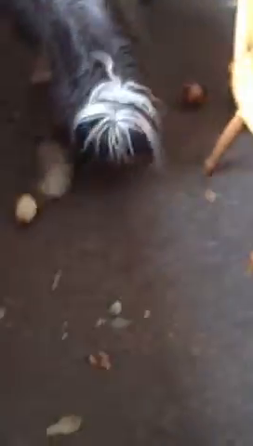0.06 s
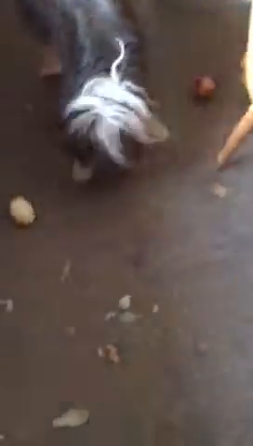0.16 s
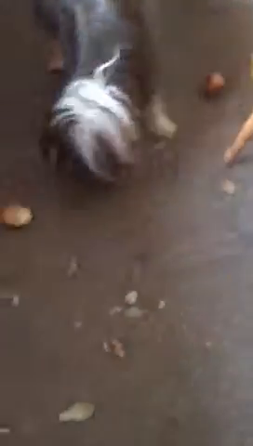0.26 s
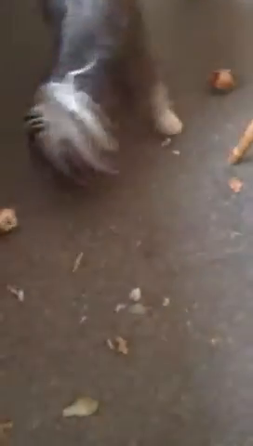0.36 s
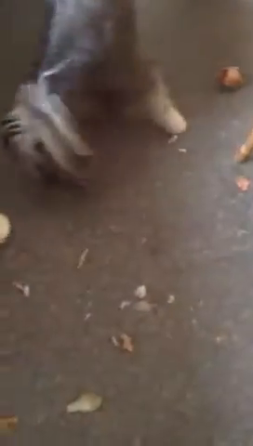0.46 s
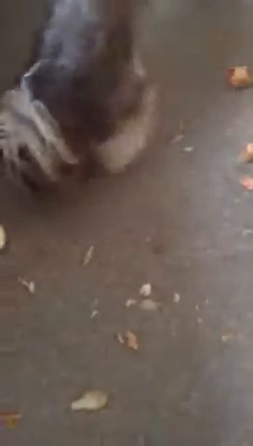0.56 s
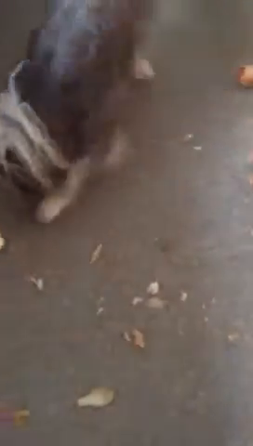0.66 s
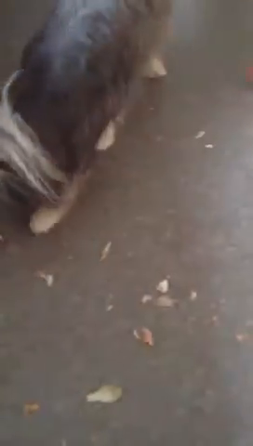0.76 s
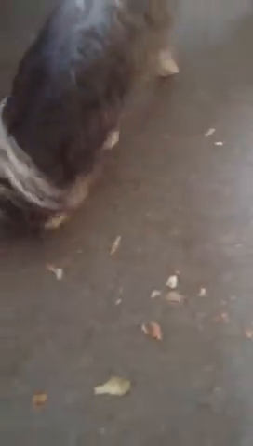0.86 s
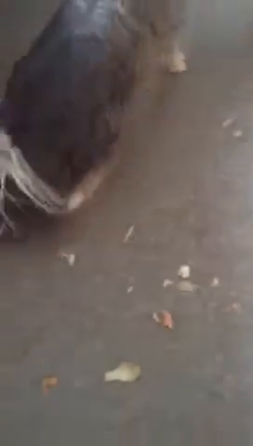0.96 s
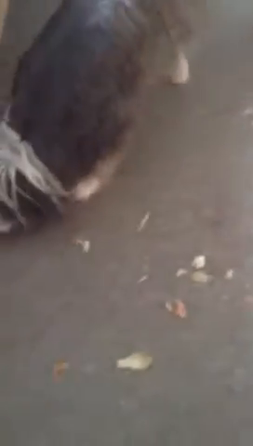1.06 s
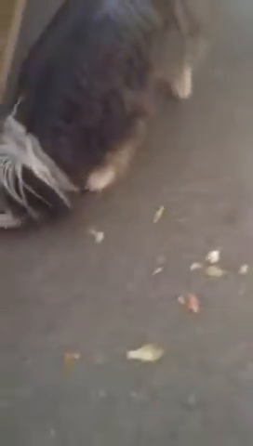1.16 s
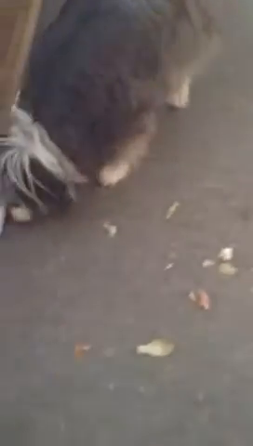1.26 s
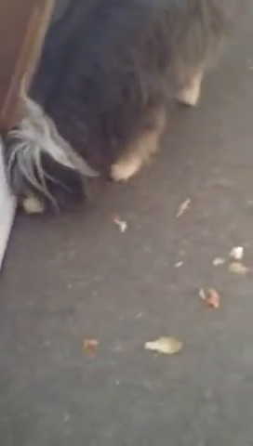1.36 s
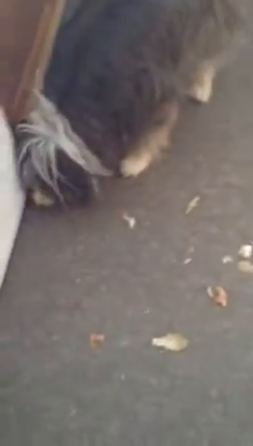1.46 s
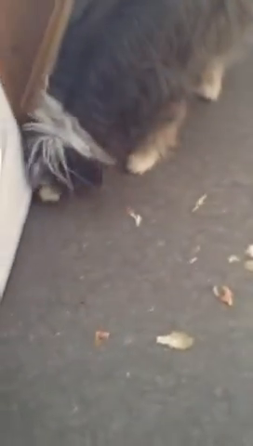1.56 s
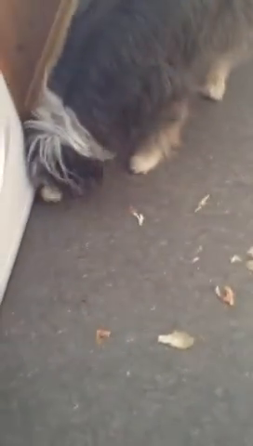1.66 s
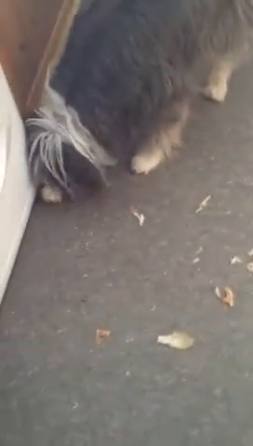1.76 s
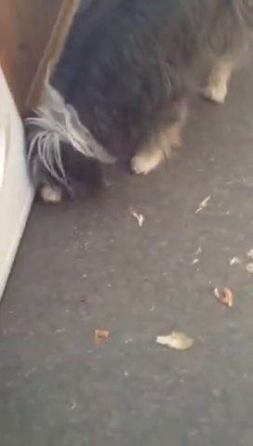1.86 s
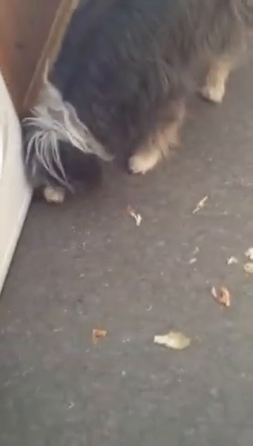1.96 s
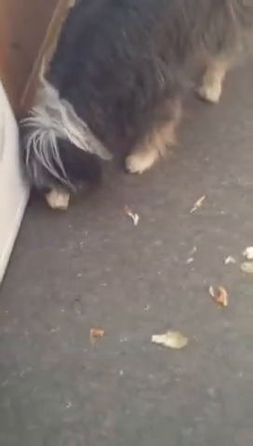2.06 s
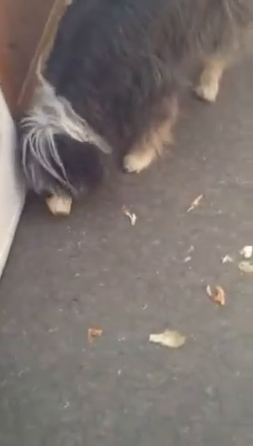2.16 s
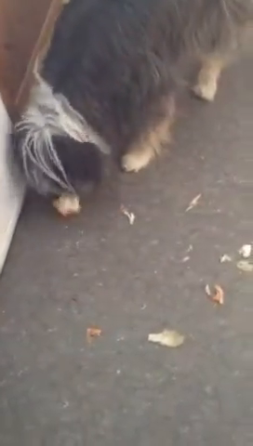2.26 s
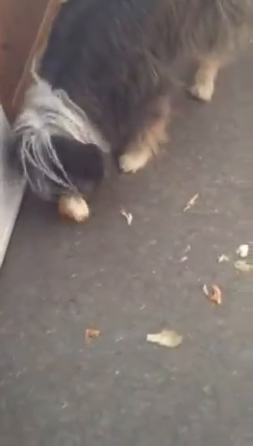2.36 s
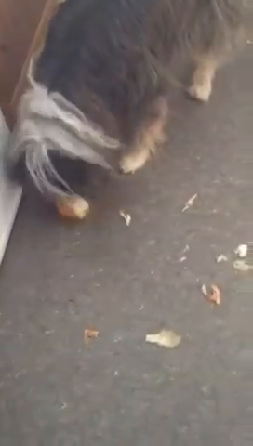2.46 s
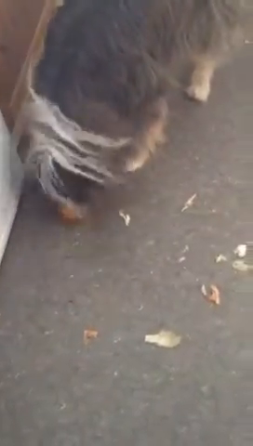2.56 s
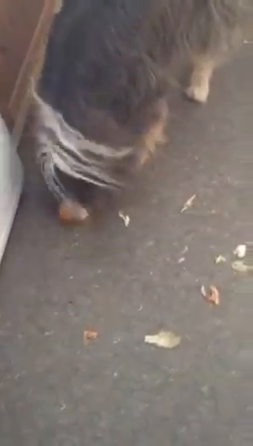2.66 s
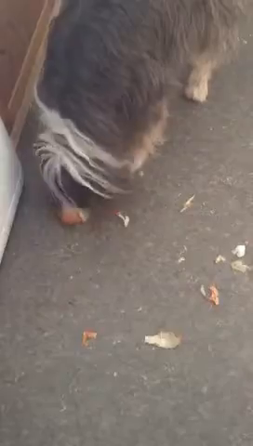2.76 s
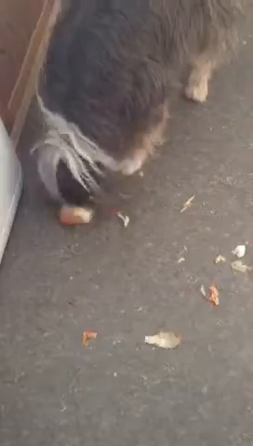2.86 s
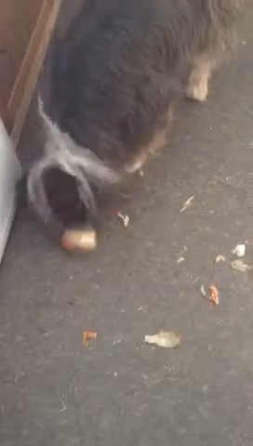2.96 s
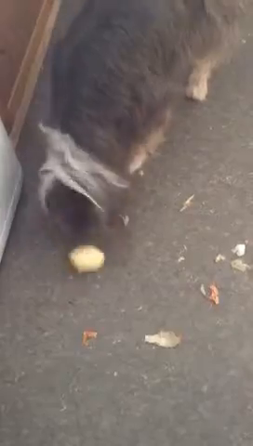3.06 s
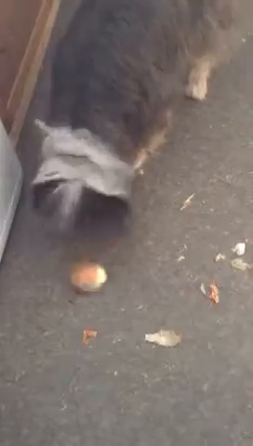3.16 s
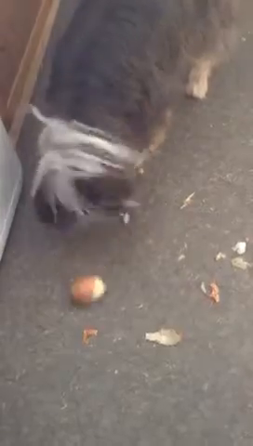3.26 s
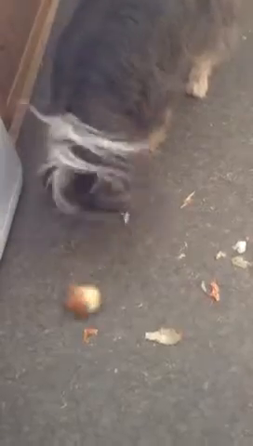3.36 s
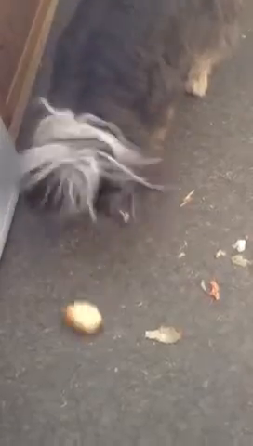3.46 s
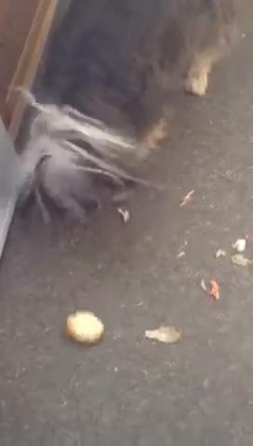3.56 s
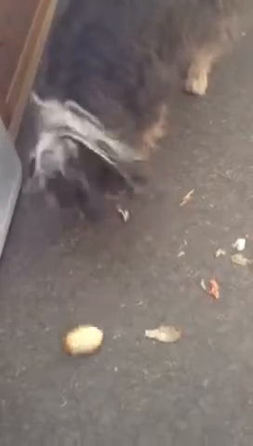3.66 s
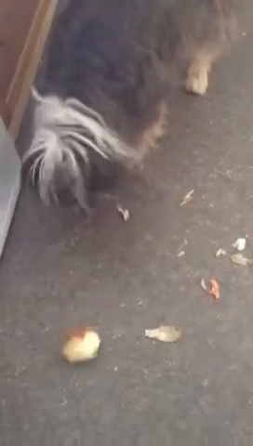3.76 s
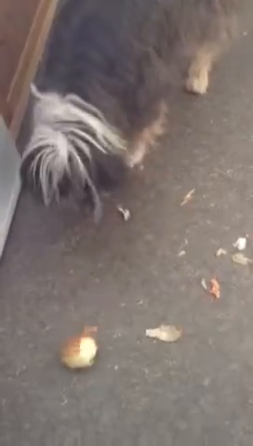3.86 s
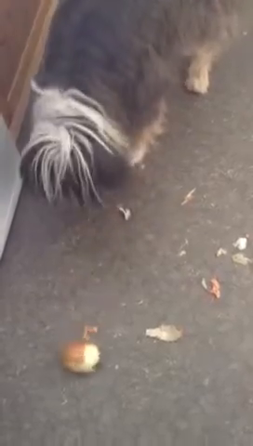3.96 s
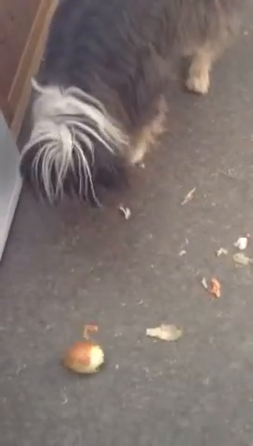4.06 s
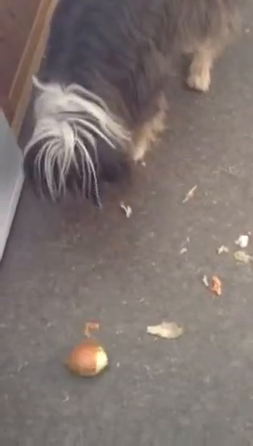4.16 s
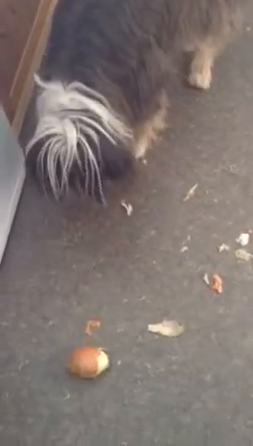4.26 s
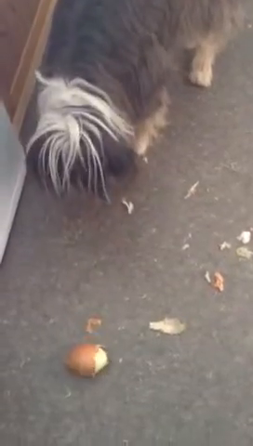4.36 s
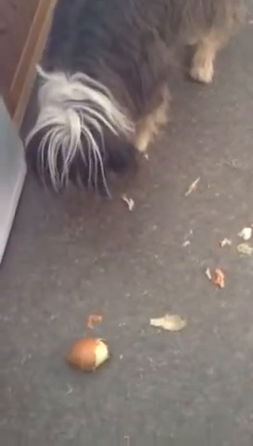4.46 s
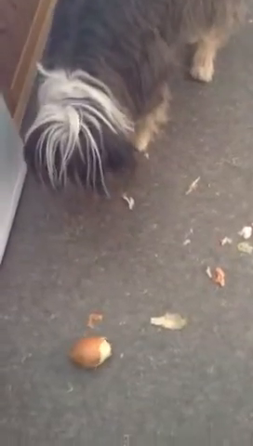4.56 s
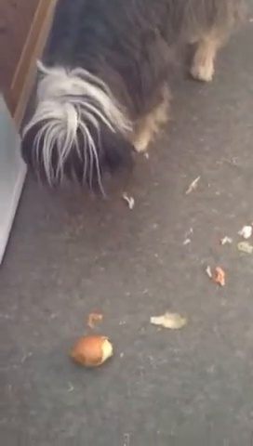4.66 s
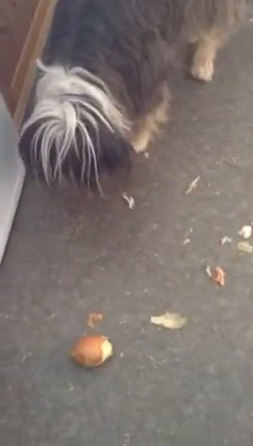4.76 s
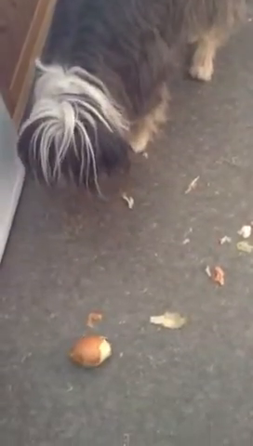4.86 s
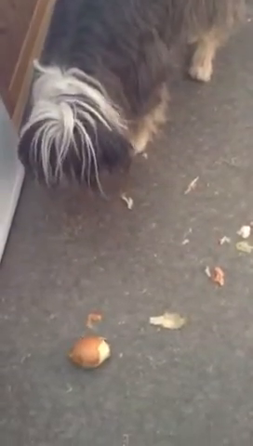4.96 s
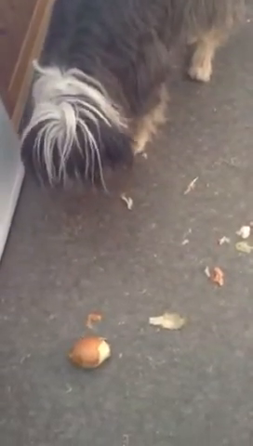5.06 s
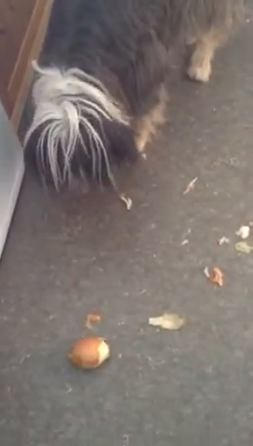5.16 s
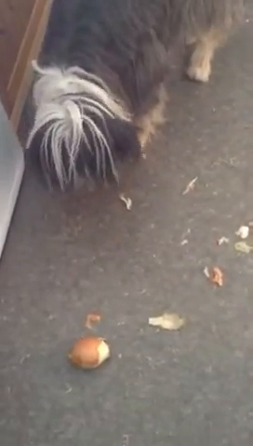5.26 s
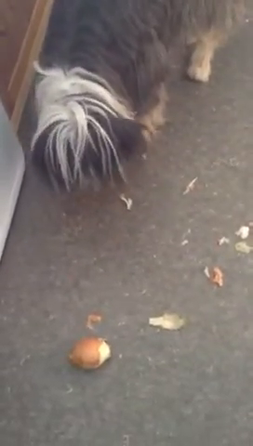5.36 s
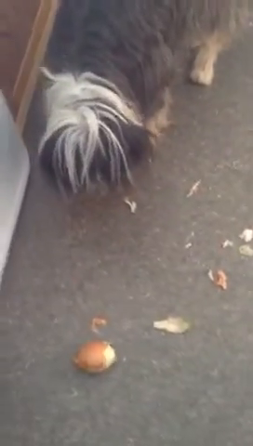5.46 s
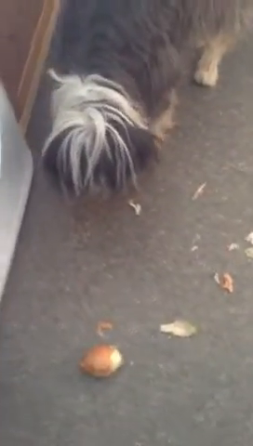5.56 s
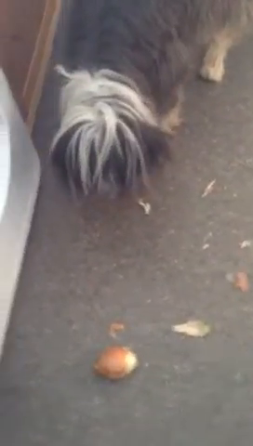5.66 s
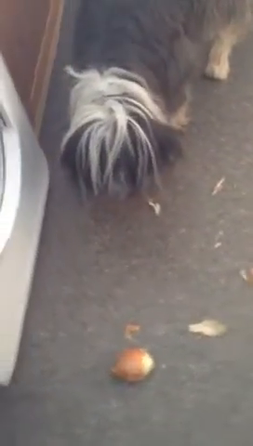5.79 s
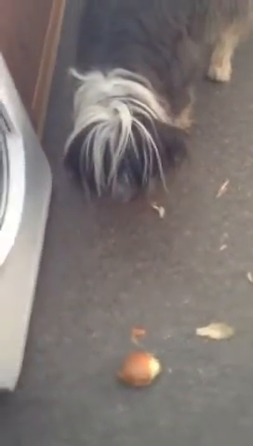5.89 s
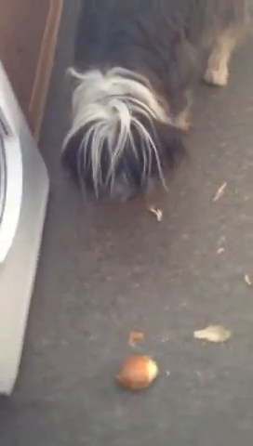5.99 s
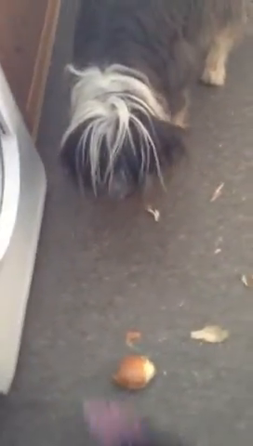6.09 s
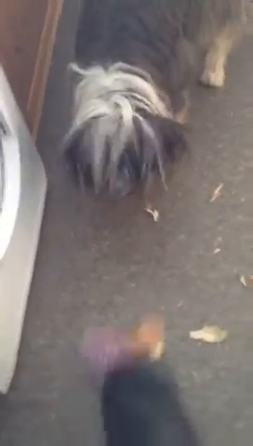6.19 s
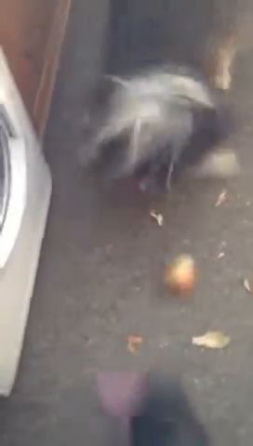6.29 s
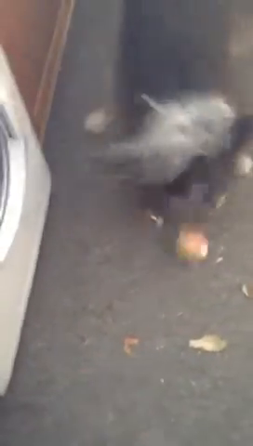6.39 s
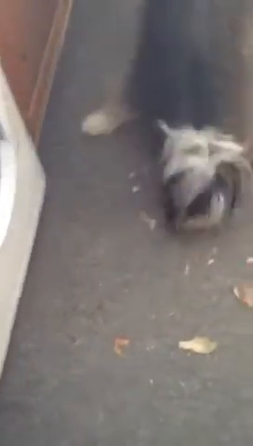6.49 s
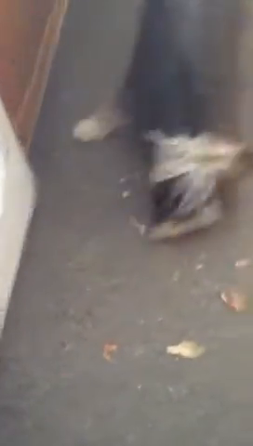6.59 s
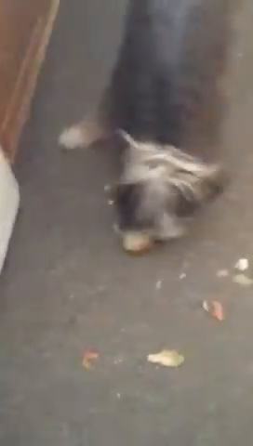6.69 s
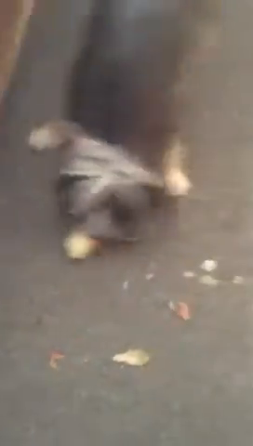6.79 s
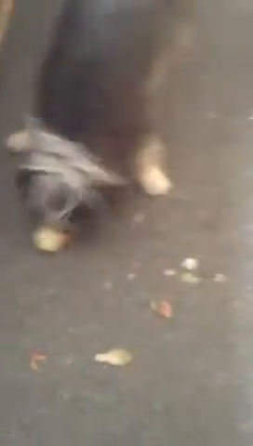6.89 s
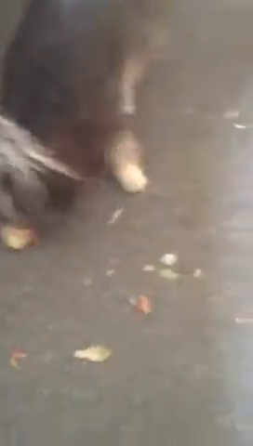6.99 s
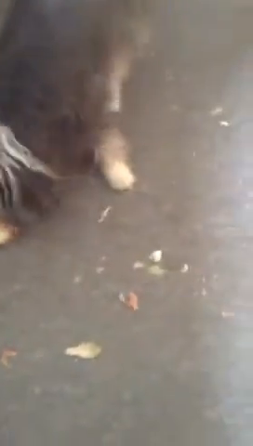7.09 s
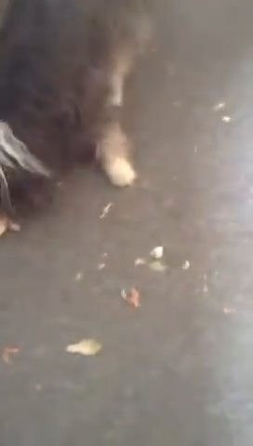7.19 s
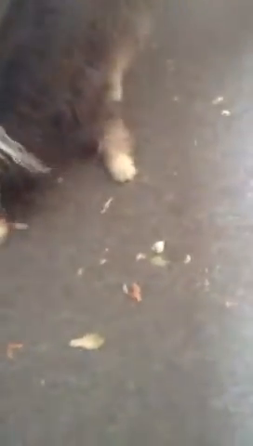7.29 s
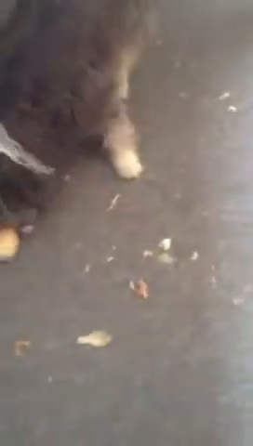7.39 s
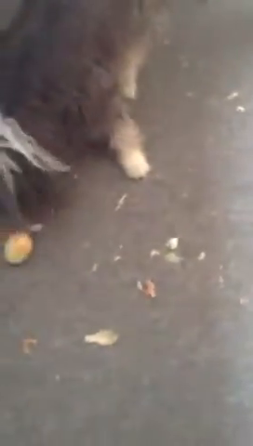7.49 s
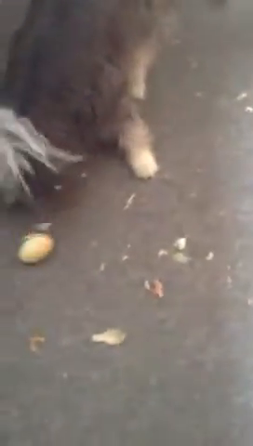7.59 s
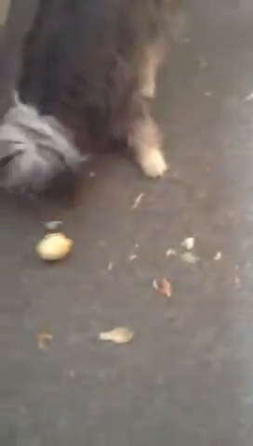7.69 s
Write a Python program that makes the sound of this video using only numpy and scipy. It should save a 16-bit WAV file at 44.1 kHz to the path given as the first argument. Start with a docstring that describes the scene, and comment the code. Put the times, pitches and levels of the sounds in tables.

```python
"""Indoors, on a hard floor, a small dog gnaws and tears an onion whose dry skin snaps, rips and crinkles.
Skin, teeth and claws are fractures exciting resonances; tears and scuffs are dense trains of grains.
Blows of onion, paws and cabinet ring modes; a collar tag tinkles as a sum of decaying partials.
Diffuse room tails answer these sounds, an appliance panel rings along, and a faint hum of
narrow noise bands lies over the room's hiss."""
import sys
import numpy as np
from scipy import signal
from scipy.fft import rfft, irfft, next_fast_len
from scipy.io import wavfile
from scipy.ndimage import uniform_filter1d, map_coordinates

SR = 44100
rng = np.random.default_rng(int(sys.argv[2]) if len(sys.argv) > 2 else 0)


def materialize(psi):
    """Save the field psi as 16-bit PCM at rate SR to the path in sys.argv[1].

    A 1-D psi becomes a single channel; in a 2-D psi each row is a channel.
    """
    bounded = np.clip(np.atleast_2d(psi).T, -1, 1)
    quanta = np.round(bounded * 32767).astype(np.int16)
    wavfile.write(sys.argv[1], SR, quanta)


N = 340893  # samples in the scene

# spectrum of the room's hiss: f/Hz, relative level/dB
HISS_SPECTRUM = [(18, -84), (30, -59), (133, -36.5), (197, -11.5), (284, -16), (332, -16.5), (443, -21.5),
                 (492, -23), (575, -23.5), (945, -27), (1140, -24), (1720, -37), (2300, -33.5), (3400, -37),
                 (15500, -37.5)]
# bands of the appliance drone: f/Hz, half the width of each of two cascaded resonances/Hz, rms level/dB
DRONE_BANDS = [(169.4, 14, -75.5), (195.5, 7.7, -69.5), (209.4, 6.9, -68), (248, 7.2, -82.5),
               (322.4, 5.2, -76.5), (1038, 4.5, -82.5), (1169, 18, -78.5), (1150, 390, -79.5)]
# bouts of walking, gnawing, rolling and chasing, each a curve: t/s, activity as crinkle level/dB
BOUTS = [
    [(0, -59), (0.12, -61.5), (0.2, -59.5), (0.62, -65), (0.78, -67.5), (0.94, -69.5), (1.02, -96)],
    [(1.47, -78), (1.54, -63.5), (1.6, -53.5), (1.73, -59), (1.86, -57), (2.06, -67.5), (2.3, -51),
     (2.41, -59.5), (2.6, -58), (2.76, -64), (2.82, -79)],
    [(3.15, -70), (3.33, -69), (3.58, -59.5), (3.75, -72.5), (3.85, -95)],
    [(5.36, -71), (5.53, -78), (5.6, -76), (5.85, -70), (6.03, -79), (6.16, -68.5), (6.24, -54.5),
     (6.4, -57), (6.62, -60.5), (6.89, -58.5), (7.02, -69), (7.22, -63), (7.3, -66), (7.52, -55.5),
     (7.73, -56)],
]
# spectrum of crinkling loose skin: f/Hz, relative level/dB
CRINKLE_SPECTRUM = [(1200, -22), (2500, 4.5), (4000, 7), (7000, 3.5), (12000, 2), (15500, -7.5)]
# spectrum of rubbing along the floor: f/Hz, relative level/dB
RUB_SPECTRUM = [(100, -38), (250, -25), (600, 0), (1150, 0.5), (2300, -3), (3500, -4.5), (8000, -30.5)]
# snaps of skin, teeth and claws: t/s, decay length/s, nominal level/dB, resonance f/Hz, relative brightness/dB
SNAP_EVENTS = [(.1055, 0.00053, -44, 6500, -22), (.1358, 0.0019, -27.5, 5160, -22),
               (.195, .0004, -38.5, 5000, -18), (.3259, 0.0034, -24.5, 6860, -6),
               (.4945, 0.00044, -50, 2900, -29), (.9031, 0.002, -52.5, 2900, -29),
               (1.1623, 0.0018, -32.5, 3540, -12), (1.171, .004, -34, 3500, -17),
               (1.2088, 0.002, -33.5, 1800, -7), (1.5862, 0.0018, -36, 4500, -29),
               (1.596, .001, -35, 10000, -12), (1.6558, 0.0011, -36.5, 8700, -3),
               (1.6725, 0.00051, -47, 7500, -14), (1.6757, 0.005, -34, 7400, -16),
               (1.7394, 0.0019, -36.5, 9600, -20), (1.748, .004, -46, 4000, -3),
               (1.8353, 0.0012, -41, 3050, -8), (1.906, 0.00025, -37.5, 1670, -11),
               (1.9924, 0.00066, -38, 3000, -21), (1.9927, 0.001, -27, 8400, -32),
               (2.0028, .0004, -53, 9600, -20), (2.1977, 0.00019, -29.5, 9300, -27),
               (2.2091, .0005, -46.5, 9200, -22), (2.4276, 0.003, -29, 3640, -7.5),
               (2.5478, 0.0037, -34, 3900, -11), (2.5523, 0.00058, -38, 11000, -15),
               (2.6222, 0.0012, -40, 4140, -2), (2.6831, 0.0009, -45, 2400, -5),
               (2.733, 0.00046, -46, 3450, -10), (2.9495, 0.0033, -24.5, 8500, 2),
               (3.2875, 0.00484, -45.5, 3930, -8), (3.361, 0.0008, -45, 4470, -9),
               (3.4654, 0.00069, -48, 4430, -16), (3.4739, 0.0025, -41, 3560, -29),
               (3.5992, 0.0046, -27.5, 7000, -13), (4.3, 0.0063, -61, 2500, -7),
               (5.165, .008, -67, 4000, -1), (5.318, .001, -57, 3000, -18),
               (5.3251, 0.0006, -52, 4200, -20), (5.334, 0.00227, -48.5, 2600, -22),
               (5.3778, .0016, -45, 2000, -35), (5.3817, .0008, -46.5, 1680, -33),
               (5.387, 0.002, -46, 2800, -27), (5.6728, .0006, -61, 3900, -14),
               (6.1763, 0.0075, -34.5, 2210, -4), (6.285, 0.0014, -36, 7630, -6),
               (6.2918, 0.0025, -34.5, 7200, -18), (6.3843, 0.0029, -39.5, 9000, -5),
               (6.4014, 0.002, -34, 6540, -2), (6.4505, 0.0034, -41, 8000, -6),
               (6.5025, .002, -37, 7500, -5), (6.508, 0.0087, -30, 8700, -9),
               (6.6065, 0.0027, -36.5, 1860, -18), (6.6885, .001, -52, 11000, 5),
               (6.761, .001, -42, 3900, -11), (6.7735, 0.013, -27, 10370, 0),
               (6.833, 0.0054, -28.5, 2380, 0), (6.929, 0.0025, -33, 4730, -11),
               (7.0924, 0.0011, -38, 3620, -11), (7.1769, 0.00069, -52, 3250, -10.5),
               (7.1945, 0.0011, -46.5, 2420, -11), (7.3105, 0.0072, -41.5, 4000, -12),
               (7.3245, 0.0078, -32, 3970, -14), (7.3334, 0.002, -26, 7000, 7),
               (7.351, 0.0064, -25.5, 6350, -4), (7.374, 0.0043, -11, 3700, -9.5),
               (7.3825, 0.0092, -19, 6500, -7), (7.3912, 0.0014, -30, 12000, -8),
               (7.4115, 0.00118, -24.5, 6350, -14), (7.6065, 0.0059, -30.5, 8900, -23),
               (7.637, .0015, -48, 7180, -21), (7.694, .001, -49, 3000, -3),
               (7.714, 0.0028, -40, 3900, -11)]
# onion and paws on the floor: t/s, direct peak level/dB, lower edge f/Hz, upper edge f/Hz
FLOOR_BLOWS = [(.136, -45, 200, 2500), (.326, -49.5, 300, 3000), (2.179, -49, 496, 1300),
               (2.4274, -41, 200, 2500), (3.6, -47, 130, 1800), (5.837, -44.5, 804, 1500),
               (6.1755, -32, 170, 4000), (6.6045, -38.5, 150, 900), (7.351, -37, 600, 900),
               (7.711, -40.5, 700, 1090)]
# modes of the onion on the floor: f/Hz, width/Hz, relative level/dB
ONION_MODES = [(240, 86, 0), (636, 150, -6), (960, 310, -4.5), (1490, 110, -0.5), (1720, 120, -1),
               (2100, 110, -2), (2740, 200, -6), (3270, 220, -7)]
# rips of skin: t/s, pull length/s, nominal level/dB, treble tilt/(dB per octave), swell start to end/dB
RIP_EVENTS = [(0.15, 0.041, -54, -4, -7), (0.534, 0.018, -53.5, -4, -3), (0.646, 0.036, -53.5, -6, 2),
              (1.144, 0.0716, -48.5, -1, 4), (1.262, 0.053, -55, -4, 3), (1.644, 0.028, -53.5, -4.5, 11),
              (1.741, 0.035, -52.5, -5, -17), (1.906, 0.024, -43, -4, 2), (2.541, 0.017, -43, -1, 2),
              (2.923, 0.066, -36.5, -0.9, 19), (2.982, 0.088, -38, 0.2, -7), (6.503, 0.024, -47.5, -4.5, 1),
              (6.76, 0.16, -46, -0.5, -0.5), (7.327, 0.063, -39, 0.5, 15), (7.596, 0.0094, -49, 2, 13)]
# spectrum of tearing skin: f/Hz, relative level/dB
SKIN_SPECTRUM = [(60, -65), (180, -33), (300, -5.5), (439, -24.5), (674, -11), (937, -9), (1370, -5.5),
                 (2100, -2.5), (3940, 1), (11900, 2.5), (15500, 0.5)]
# dog and onion bump the cabinet: t/s, direct peak level/dB, lower edge f/Hz, upper edge f/Hz
CABINET_BLOWS = [(1.208, -26.5, 230, 2300), (1.485, -46, 390, 1180), (1.583, -44.5, 249, 1496),
                 (2.426, -44.5, 240, 260), (2.49, -51, 240, 240), (2.545, -50.5, 240, 280)]
# modes of the wooden cabinet: f/Hz, width/Hz, relative level/dB
CABINET_MODES = [(179, 42, 11), (331, 70, 2), (393, 160, -3.5), (662, 21, 6), (784, 34, 4), (1174, 200, -4),
                 (1620, 320, -6), (1890, 370, 0.5), (2040, 790, -3.5)]
# jaws close on the onion: t/s, decay length/s, nominal level/dB, mouth resonance f/Hz, relative brightness/dB
JAW_CLOSURES = [(1.5503, 0.0029, -36.5, 2930, -13), (1.5828, 0.0017, -39, 3900, -20),
                (1.5857, .0025, -29.5, 1670, -2.5), (1.8815, .0032, -35.5, 3080, -6),
                (1.917, 0.0046, -38, 1980, -16), (1.924, 0.0037, -34, 3300, -23),
                (2.113, 0.0044, -33, 2280, -13), (2.1788, .005, -33, 1740, -9),
                (2.262, .003, -32.5, 1900, -10), (2.2655, 0.005, -24.5, 2010, -5),
                (2.771, 0.0056, -41.5, 1500, -26), (2.784, 0.0024, -47.5, 2400, -24),
                (3.543, 0.0037, -40, 1500, -25), (3.5737, .0018, -38, 1840, -10)]
# collar tag touches its ring: t/s, nominal level/dB, relative level of upper modes and tick/dB
TAG_TOUCHES = [(3.212, -62, -11), (3.361, -64.5, -10), (3.401, -68, -9), (3.446, -58, -11),
               (3.601, -52, -5.5), (3.721, -72, 4.5), (3.974, -64.5, -1.5), (4.135, -75.5, -12),
               (6.444, -51.5, 3.5), (6.501, -53, 7)]
# modes of the metal tag: f/Hz, relative level/dB, t60/s
TAG_MODES = [(7330, 1.5, 0.14), (7850, -10, 0.1), (8323, -2, 0.091), (8420, 4, 0.08), (9000, -13, 0.13),
             (15230, 0, 0.12)]
# paws and fur brush the floor: t/s, length/s, level before the stroke's envelope/dB, centre f/Hz
BRUSH_STROKES = [(5.355, 0.034, -65, 2900), (5.412, 0.09, -61, 2300), (5.778, 0.1, -68, 1610),
                 (6.265, 0.03, -54, 6700), (6.678, 0.26, -52.5, 8550), (7.363, 0.059, -43.5, 1170)]
# modes of the sheet-metal side panel: f/Hz, width/Hz, gain/dB
PANEL_MODES = [(796, 16, -11.5), (1144, 25, -3.5)]
# reverberation of the room: f/Hz, t60/s
ROOM_DECAY = [(100, 0.66), (250, 0.5), (600, 0.36), (1300, 0.43), (3700, 0.31), (10000, 0.31), (15000, 0.2)]

HISS_WAVER_DB, HISS_WAVER_PER_S = 2.0, 3.963  # depth and knots a second
DRONE_WAVER_DB, DRONE_WAVER_PER_S = 3, 11  # each band wavers on its own
FADE_S = 0.03  # a bout's fade in and out
USUAL_DB = -60  # usual activity
RUB_DB, RUB_GROWS = -62.5, 0.72  # rub level at usual activity, dB gained per dB of activity
SHIFT_DB = 4  # how deeply the colour of crinkle and rubbing shifts
TICKS_PER_S, TICK_DB, TICK_SPREAD_DB = 13, 8.5, 4  # stray ticks: pace, level over activity, scatter
TICK_HZ, TICK_OCTAVES = 4070, 0.79  # usual resonance and its scatter
TICK_BRIGHT_DB, TICK_LENGTH_S = -28, 0.00093
CRACK_DB, CRACK_GROWS = -2, 0.32  # middle band at brightness 0, dB gained per dB of brightness
EDGE_SHARE = 0.33  # radiation edge as a share of the lower of resonance and crack band
TOP_HZ = 15400  # band limit


def amp(db):
    """Level to gain: 20 dB for each factor of ten in amplitude."""
    return 10 ** (np.asarray(db) / 20)


def unit(x):
    """Normalisation to an rms of 1."""
    return x / np.sqrt(np.mean(x ** 2) + 1e-20)


def along(points, hz):
    """Interpolation of (f/Hz, value) points on a logarithmic frequency axis."""
    f, v = np.transpose(points)
    return np.interp(np.log(hz + 1), np.log(f), v)


def filtered(x, response):
    """Linear filtering: the spectrum times a complex response of frequency."""
    m = next_fast_len(len(x) + min(len(x), SR // 8))
    return irfft(rfft(x, m) * response(np.fft.rfftfreq(m, 1 / SR)), m)[:len(x)]


def resonance(f, centre, width):
    """Damped harmonic oscillator: a causal resonance with gain 1 at its centre."""
    return 1j * f * width / (centre ** 2 - f ** 2 + 1j * f * width)


def causal(gain):
    """Minimum phase: folding the cepstrum gives a response that starts at once and rings afterwards."""
    cepstrum = irfft(np.log(np.maximum(gain, 1e-5 * gain.max())))
    half = len(cepstrum) // 2
    cepstrum[1:half] *= 2
    cepstrum[half + 1:] = 0
    return irfft(np.exp(rfft(cepstrum)))


def add(track, s, x):
    """Superposition: mix x into the track from s seconds on."""
    part = track[round(s * SR):][:len(x)]
    part += x[:len(part)]


def wobble(rate):
    """Smooth random modulation: a spline through rate random knots a second."""
    return map_coordinates(rng.standard_normal(size=200), [np.arange(N) * rate / SR], mode="mirror")


def crackle(n, rate, spread_db):
    """Random impulse process: tiny fractures, rate a second, of widely varying size and either sign."""
    size = amp(spread_db * np.minimum(rng.standard_normal(n), 2))
    return (rng.random(n) < rate / SR) * size * rng.choice([-1, 1], n)


def patchy(x, depth_db):
    """Time-varying spectrum: the colour keeps shifting as one patch after another gives way."""
    z = signal.stft(x, nperseg=512)[2]
    field = uniform_filter1d(rng.standard_normal(z.shape), size=7, axis=0)
    field = uniform_filter1d(field, size=5, axis=1)
    return signal.istft(z * amp(depth_db * unit(field)), nperseg=512)[1][:len(x)]


def room_tail(build):
    """Diffuse reverberation: noise of energy 1 builds up over build seconds and decays by band."""
    hz, t, z = signal.stft(rng.standard_normal(SR // 2), SR, nperseg=256)
    decay = amp(-60 * t / along(ROOM_DECAY, hz)[:, None])
    tail = signal.istft(z * decay, SR, nperseg=256)[1]
    tail *= 1 - np.exp(-(np.arange(len(tail)) / SR / build) ** 2)
    return tail / np.linalg.norm(tail)


def in_room(x, wet_db):
    """Convolution with a room response: the direct sound plus a diffuse tail."""
    answer = amp(wet_db) * room_tail(build=0.0012)
    answer[0] += 1
    return signal.fftconvolve(x, answer)


def hum():
    """Narrow-band noise: an appliance drones in wavering bands over the room's broadband hiss."""
    hiss = unit(filtered(rng.standard_normal(N), lambda f: amp(along(HISS_SPECTRUM, f))))
    out = amp(-67.0 + HISS_WAVER_DB * wobble(HISS_WAVER_PER_S)) * hiss
    for hz, width, db in DRONE_BANDS:
        band = filtered(rng.standard_normal(N), lambda f: resonance(f, hz, 2 * width) ** 2)
        waver = amp(DRONE_WAVER_DB * wobble(DRONE_WAVER_PER_S))
        out += amp(db) * unit(band * waver)
    return out


def fuss():
    """Granular friction: skin crinkles while muzzle, paws and onion rub the floor, as activity dictates."""
    out = np.zeros(N)
    for bout in BOUTS:
        s, activity_db = np.transpose(bout)
        start = max(s[0] - FADE_S, 0)
        t = np.arange(int(start * SR), int((s[-1] + FADE_S) * SR)) / SR
        fade = np.clip(np.minimum(t - s[0], s[-1] - t) / FADE_S + 1, 0, 1)
        crinkle_db = np.interp(t, s, activity_db)
        rub_db = RUB_DB + RUB_GROWS * (crinkle_db - USUAL_DB)
        flakes = in_room(crackle(len(t), rate=350, spread_db=7), wet_db=13.5)[:len(t)]
        crinkle = unit(filtered(patchy(flakes, SHIFT_DB), lambda f: amp(along(CRINKLE_SPECTRUM, f))))
        grains = crackle(len(t), rate=3000, spread_db=1.5)
        rub = unit(filtered(patchy(grains, SHIFT_DB), lambda f: amp(along(RUB_SPECTRUM, f))))
        add(out, start, fade * (amp(crinkle_db) * crinkle + amp(rub_db) * rub))
    return out


def stray_ticks():
    """Jittered point process: small snaps fall through each bout, their level following activity."""
    ticks = []
    for bout in BOUTS:
        s, activity_db = np.transpose(bout)
        chance = rng.standard_normal(size=(50, 3))  # jitter, size, pitch
        moments = s[0] + (np.arange(len(chance)) + chance[:, 0] / 2) / TICKS_PER_S
        for at, (_, size, pitch) in zip(moments, chance):
            if s[0] < at < s[-1]:
                db = np.interp(at, s, activity_db) + TICK_DB + TICK_SPREAD_DB * size
                hz = TICK_HZ * 2 ** (TICK_OCTAVES * np.clip(pitch, -2, 2))
                ticks.append((at, TICK_LENGTH_S, db, hz, TICK_BRIGHT_DB))
    return snaps(ticks)


def snaps(rows, q=1.56, crack_hz=3900, bright_hz=11500, crest_db=17.0, wet_db=-1, follow=0.4):
    """Impulse excitation: a sharp fracture and a brief run of weaker ones ring a small flake or claw."""
    out, t = np.zeros(N), np.arange(SR // 30) / SR
    f = np.fft.rfftfreq(len(t), 1 / SR) + 1
    for s, length, db, hz, bright_db in rows:
        # own resonance and two broad bands: f/Hz, resonator width/Hz, level/dB
        bands = [(hz, hz / q, 0),
                 (crack_hz, 3500, CRACK_DB + CRACK_GROWS * bright_db),
                 (bright_hz, 9000, bright_db + 6.0)]
        power = 0
        for centre, width, level in bands:
            power += (amp(level) * unit(np.abs(resonance(f, centre, width)) ** 2)) ** 2
        # a small flake radiates weakly at low frequencies
        edge = 1 + (EDGE_SHARE * min(hz, crack_hz) / f) ** 8
        flake = unit(causal(np.sqrt(power / edge)))
        fractures = crackle(len(t), rate=8000, spread_db=4) * np.exp(-(t / length) ** 2)
        excitation = follow * fractures + (t == 0)
        direct = unit(signal.fftconvolve(excitation, flake)[:len(t)])
        # the walls gather both this ray and the flake's colour over all directions
        tail = sum(signal.fftconvolve(ray, room_tail(build=0.00046)) for ray in (direct, flake))
        tail /= np.sqrt(2)
        # nominal level to rms
        add(out, s, amp(db - crest_db) * direct)
        add(out, s, amp(db - crest_db + wet_db) * tail)
    return out


def thuds(rows, modes, wet_db, boards_hz):
    """Modal excitation: blows ring the struck thing, whose radiation falls off in the deep bass."""
    out, push = np.zeros(N), signal.unit_impulse(SR // 6)

    def body(f):
        """Modal superposition with alternating signs."""
        return sum((-1) ** k * amp(db) * resonance(f, hz, width)
                   for k, (hz, width, db) in enumerate(modes))

    radiation = lambda f: -f ** 2 / (boards_hz ** 2 - f ** 2 + 1j * f * boards_hz)
    for s, db, low_hz, high_hz in rows:
        # heavy blows reach lower, hard ones higher
        contact = lambda f: (1j * f / (low_hz + 1j * f) / (1 + 1j * f / high_hz)) ** 2
        knock = filtered(push, lambda f: body(f) * contact(f) * radiation(f))
        add(out, s, in_room(amp(db) * knock / np.abs(knock).max(), wet_db=wet_db))
    return out


def floor_thuds():
    """Modal excitation of the onion as it and the paws strike the floor."""
    return thuds(FLOOR_BLOWS, ONION_MODES, wet_db=0.5, boards_hz=150)


def rips(edge=0.0028):
    """Fracture propagation: a tear is a dense train of fractures that swells or fades with the pull."""
    out = np.zeros(N)
    for s, length, db, tilt_db, swell_db in RIP_EVENTS:
        t = np.arange(int((length + 6 * edge) * SR)) / SR
        pull = (1 - np.exp(-t / edge)) * np.exp(-np.maximum(t - length, 0) / edge)
        pull *= amp(swell_db * (np.minimum(t / length, 1) - 0.5))
        tilt = lambda f: tilt_db * np.log2(np.maximum(f, 1000) / 6000)
        colour = lambda f: amp(along(SKIN_SPECTRUM, f) + tilt(f))
        fractures = patchy(crackle(len(t), rate=7500, spread_db=4.7), depth_db=2.5)
        tear = amp(db) * pull * unit(filtered(fractures, colour))
        add(out, s, in_room(tear, wet_db=-0.5))
    return out


def cabinet_bumps():
    """Modal excitation of the wooden cabinet as dog and onion bump it."""
    return thuds(CABINET_BLOWS, CABINET_MODES, wet_db=2.0, boards_hz=92)


def chomps():
    """Cavity resonance: jaws close on the onion and the fractures ring the mouth."""
    return snaps(JAW_CLOSURES, q=1.75, crack_hz=3900, bright_hz=10200, crest_db=18.5, wet_db=0.0, follow=0.9)


def tag(t60_tick=0.014, flutter=0.1, chatter_db=4):
    """Decaying partials: the metal tag rings at each touch; chatter breaks up and blurs its tones."""
    out, t = np.zeros(N), np.arange(SR // 3) / SR
    # flutter: random phase step in radians a sample
    phase = lambda hz: 2 * np.pi * hz * t + flutter * np.cumsum(rng.standard_normal(len(t)))
    chatter = lambda: chatter_db * map_coordinates(rng.standard_normal(size=60), [t * 110])
    for s, db, upper_db in TAG_TOUCHES:
        ring = 0
        for k, (hz, level, t60) in enumerate(TAG_MODES):
            partial_db = level + upper_db * (k > 1) + chatter() - 60 * t / t60
            ring += amp(partial_db) * np.sin(phase(hz))
        bright_noise = np.diff(rng.standard_normal(len(t) + 1))
        tick = 1.9 * amp(upper_db - 60 * t / t60_tick) * bright_noise
        add(out, s, in_room(amp(db - 1.0) * (ring + tick), wet_db=4.0))
    return out


def scuffs():
    """Sliding friction: a soft stroke of fine grains swells and fades."""
    out = np.zeros(N)
    for s, length, db, hz in BRUSH_STROKES:
        n = int(length * SR)
        grains = crackle(n, rate=7000, spread_db=9.0)
        grains = unit(filtered(grains, lambda f: resonance(f, hz, 0.88 * hz) ** 2))
        stroke = np.sin(np.pi * np.arange(n) / n) ** 0.42
        add(out, s, in_room(amp(db) * grains * stroke, wet_db=-2.0))
    return out


def panel(x):
    """Sympathetic resonance: the sound x sets the appliance's side panel ringing faintly."""
    return filtered(x, lambda f: sum(amp(db) * resonance(f, hz, width) for hz, width, db in PANEL_MODES))


def scene():
    """Superposition of dog, onion, panel and appliance in one channel."""
    dog = fuss() + stray_ticks() + snaps(SNAP_EVENTS) + floor_thuds() + rips()
    dog += cabinet_bumps() + chomps() + tag() + scuffs()
    return (dog + panel(dog) + hum())[None]


def record(dry):
    """Band limitation: only frequencies below the limit pass."""
    return np.array([filtered(x, lambda f: f < TOP_HZ) for x in dry])


dry = scene()
out = record(dry)
materialize(out)
```